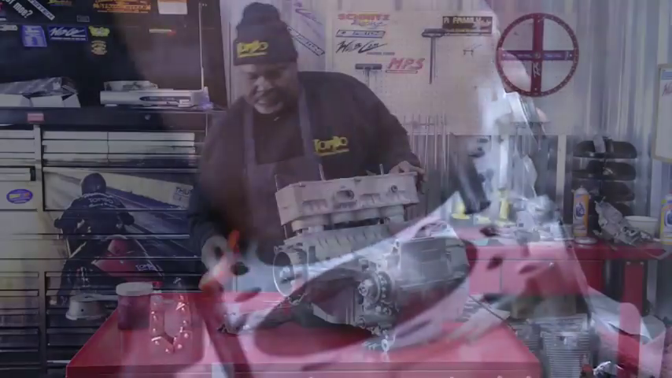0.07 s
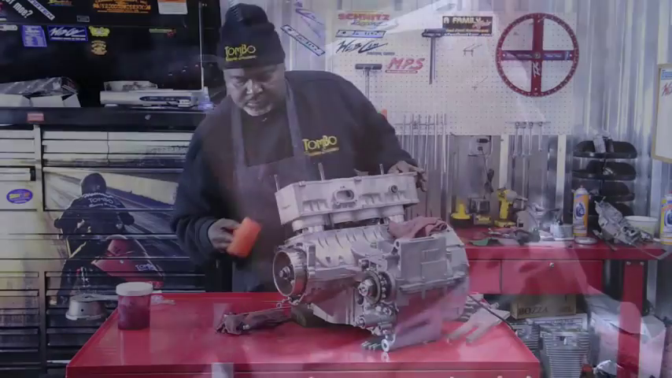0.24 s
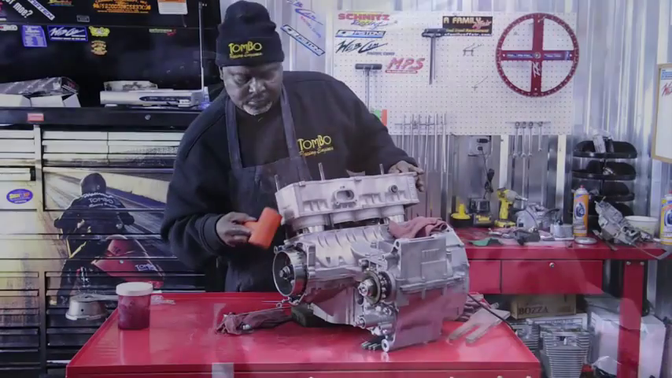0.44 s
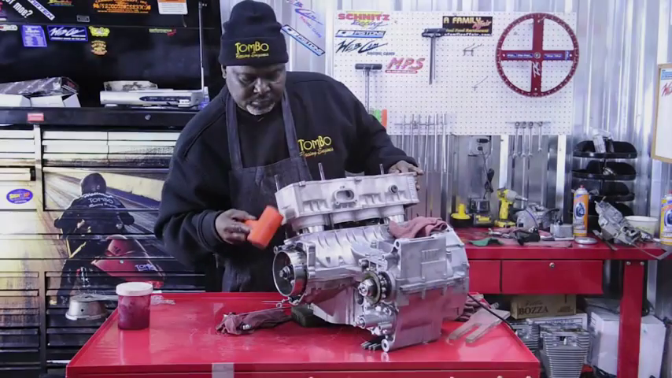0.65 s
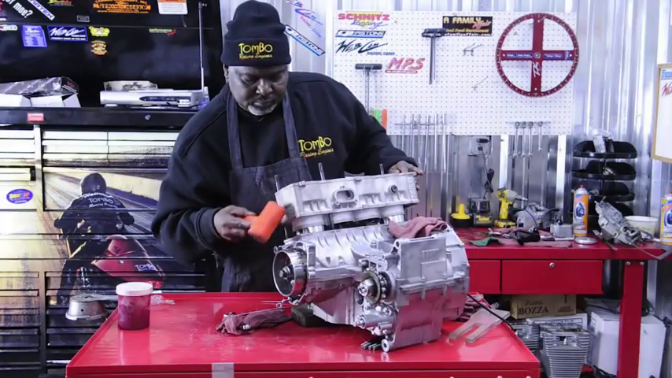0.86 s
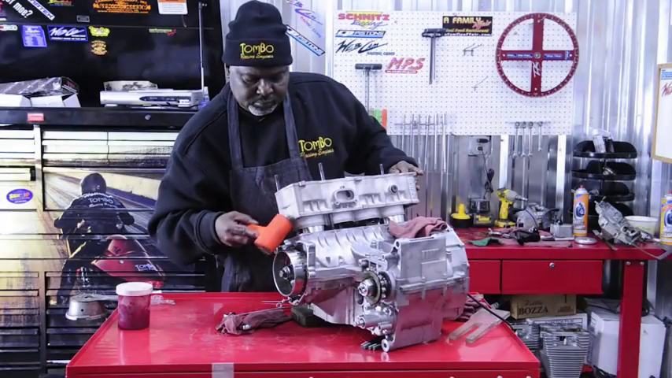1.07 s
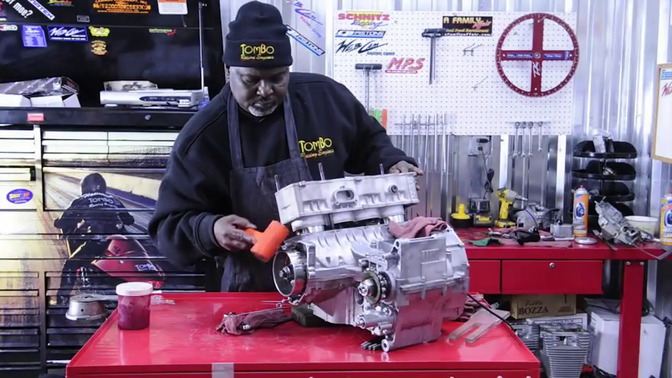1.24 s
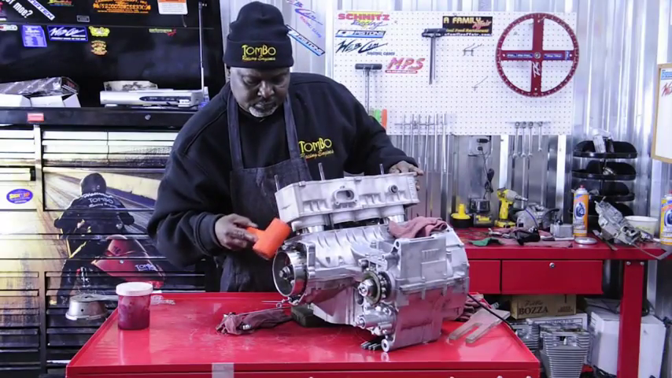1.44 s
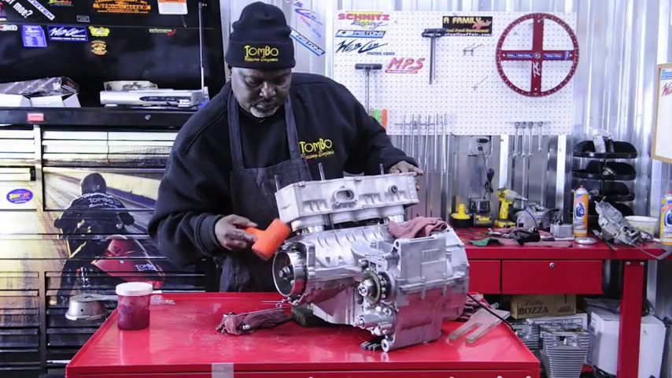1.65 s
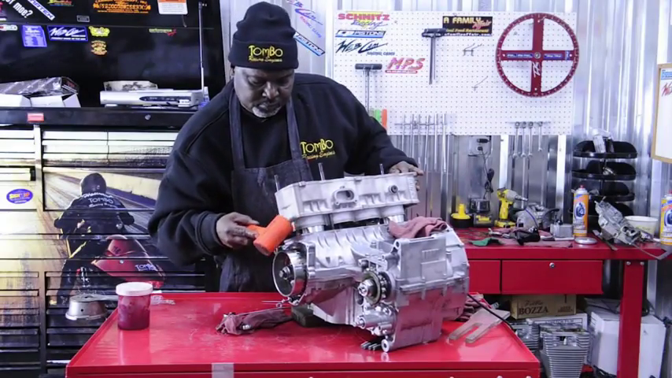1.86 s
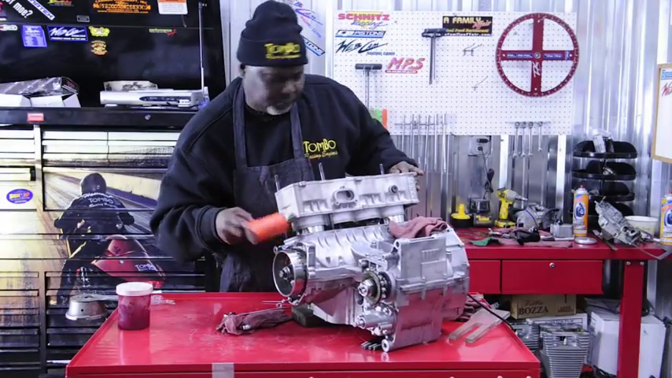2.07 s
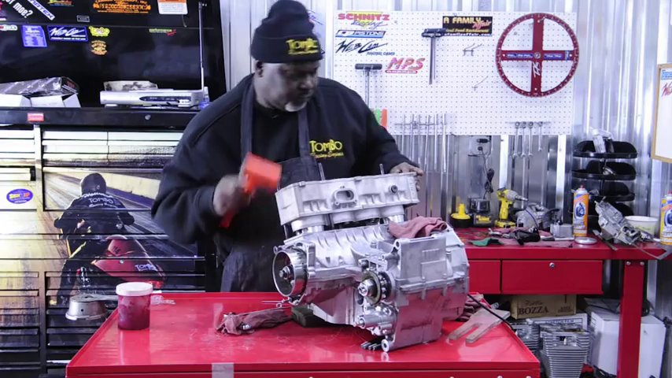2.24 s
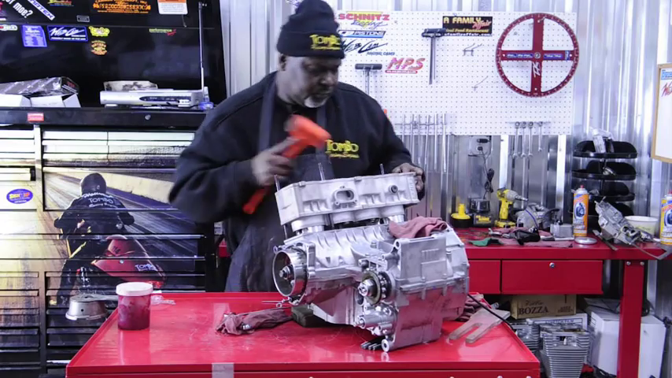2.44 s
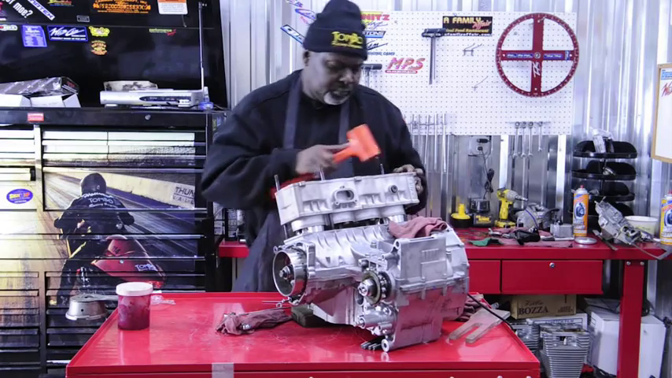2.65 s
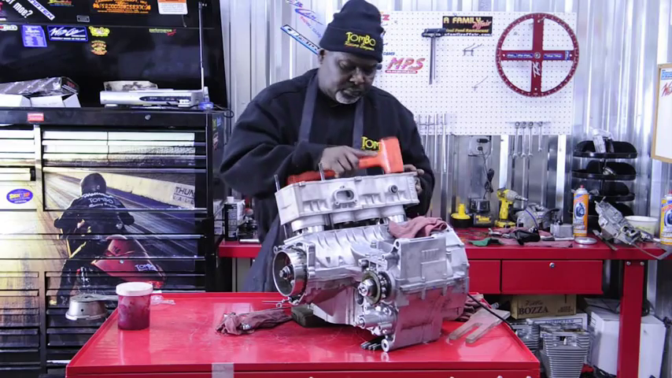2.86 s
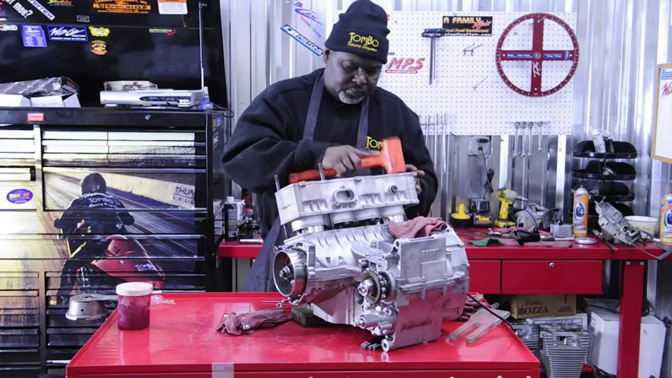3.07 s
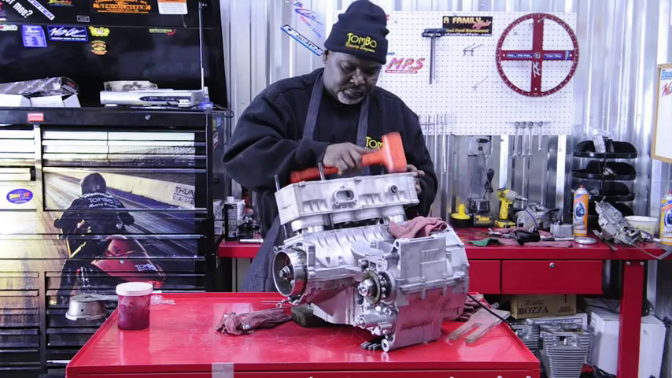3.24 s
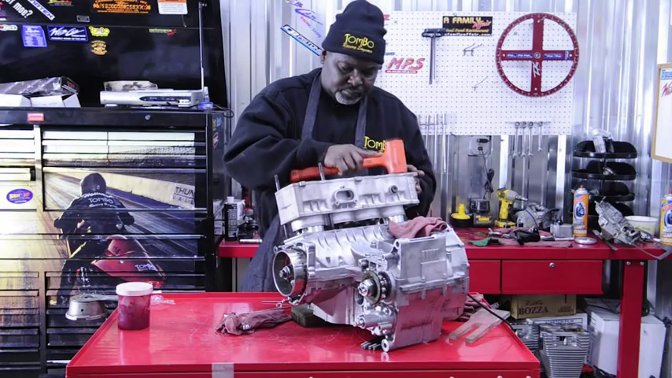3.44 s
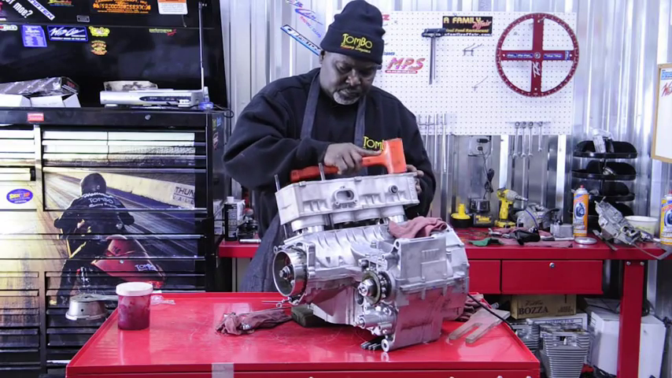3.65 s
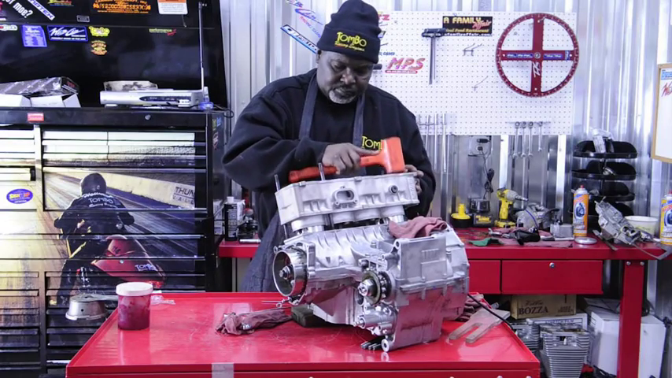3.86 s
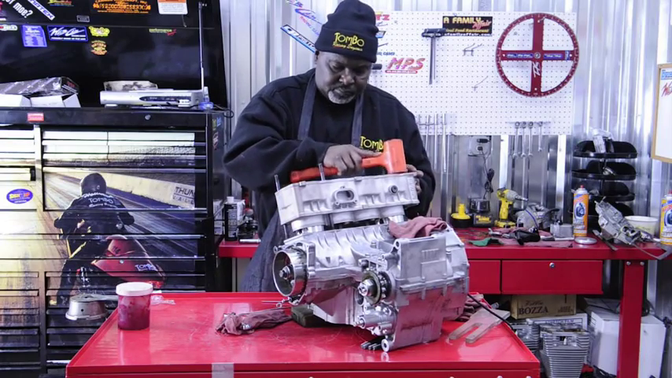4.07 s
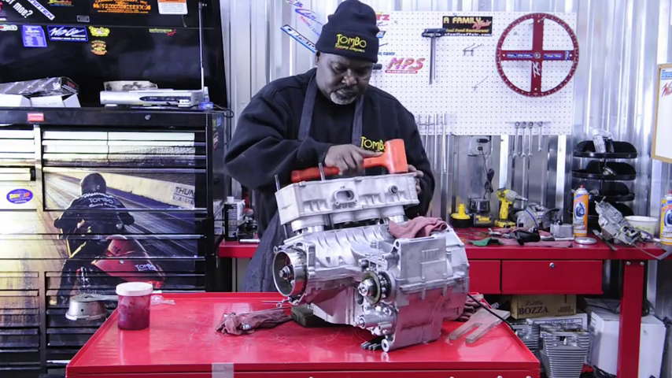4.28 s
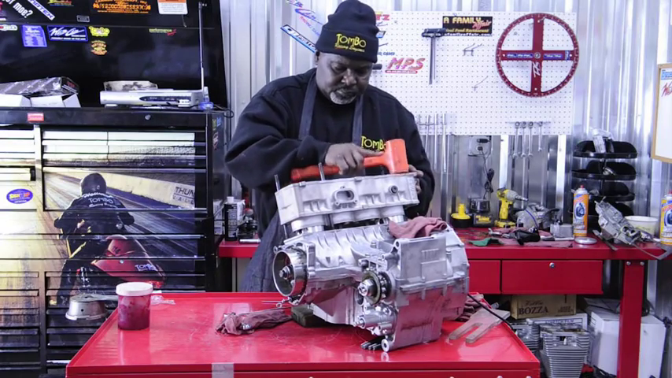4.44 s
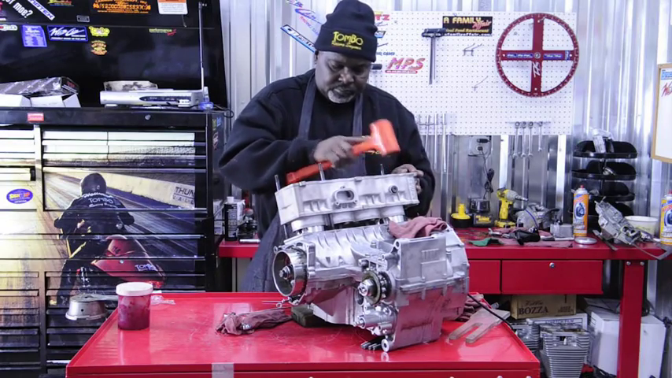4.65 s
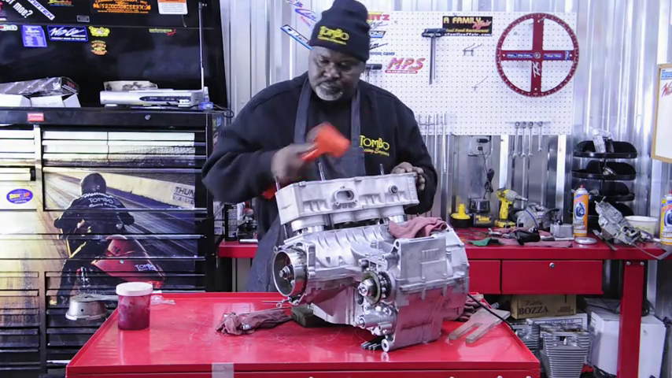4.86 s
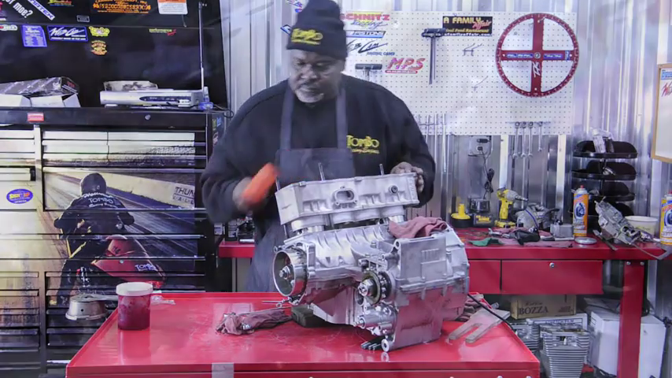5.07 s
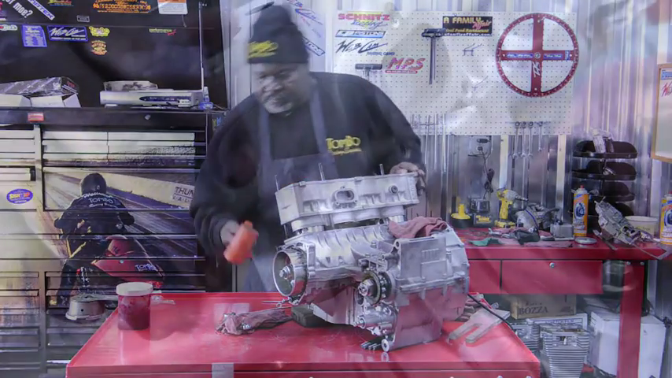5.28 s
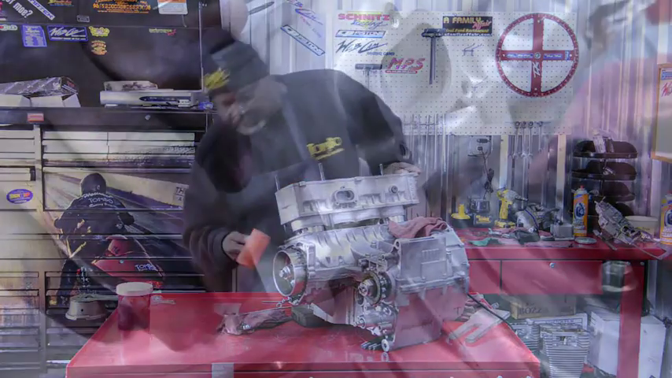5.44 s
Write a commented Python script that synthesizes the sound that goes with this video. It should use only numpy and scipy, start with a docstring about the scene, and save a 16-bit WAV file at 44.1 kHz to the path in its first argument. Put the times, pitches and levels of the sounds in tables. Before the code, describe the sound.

Light ticks and muted taps on cast metal lead into hard, evenly spaced mallet blows, a pause, and three last strikes over faint rumble.

```python
"""Soft taps, then seven heavy knocks and two glancing ones ring over a low rumble, among ticks and rustling.
A shot-filled plastic mallet taps a cast cylinder block down its studs on a steel bench, heard close and near-mono.
Each contact is a damped swing; brief forces feed decaying modes of block and bench, and the studs clack.
Enveloped noise makes the loose shot and the sleeves; a diffuse tail makes the hard-walled workshop answer."""
import sys
import numpy as np
from scipy import signal
from scipy.fft import rfft, irfft
from scipy.io import wavfile
from scipy.ndimage import uniform_filter1d

SR = 44100
rng = np.random.default_rng(int(sys.argv[2]) if len(sys.argv) > 2 else 0)


def master_out(mix):
    """Clip the mix to full scale and print it as 16-bit PCM to the path in sys.argv[1]."""
    frames = np.transpose(np.atleast_2d(mix))
    ceiling = np.clip(frames, -1, 1)
    pcm = np.round(ceiling * 32767).astype(np.int16)
    wavfile.write(sys.argv[1], SR, pcm)


def ratio_of_db(decibels):
    """Turn decibels (scalar or array-like) into linear amplitude factors; 0 dB maps to 1."""
    return 10 ** (np.asarray(decibels, float) / 20)


N = 242991  # samples
T = np.arange(N) / SR  # s


def colour(x, points):
    """Linear filtering: the spectrum is weighted by (Hz, dB) points on a log-frequency axis."""
    hz, db = np.transpose(points)
    f = np.arange(N // 2 + 1) * SR / N + 1  # the added 1 Hz keeps the logarithm finite
    gain = ratio_of_db(np.interp(np.log(f), np.log(hz), db))
    return irfft(rfft(x) * gain, N)


def band(x, lo_hz, hi_hz, order=2):
    """Band limitation by a Butterworth band-pass."""
    edges_hz = [lo_hz, min(hi_hz, 0.45 * SR)]
    return signal.sosfilt(signal.butter(order, edges_hz, "band", fs=SR, output="sos"), x)


def unit(x):
    """Power normalisation to rms 1."""
    return x / np.sqrt(np.mean(x ** 2))


def walk(rate):
    """Random modulation: levels drawn at the given rate in Hz, each slewed into the next."""
    hold = int(SR / rate)
    steps = np.repeat(rng.standard_normal(N // hold + 1), hold)
    return uniform_filter1d(steps, hold)[:N]


# Spectrum of the workshop air. Each row: frequency in Hz, relative density in dB per Hz.
SHOP_SPECTRUM = [(12, -48.5), (20, -10), (60, 3.5), (96, 2.5), (210, -11), (357, -12.5), (678, -30),
                 (738, -29), (897, -28), (2320, -33), (2990, -35), (4420, -41), (14700, -44), (16000, -42)]
SHOP_DB = -49


def shop():
    """Stationary background noise: rumble and faint hiss of the workshop, its low end wavering in level."""
    air = unit(colour(rng.standard_normal(N), SHOP_SPECTRUM))
    low = band(air, 30, 560)
    waver = ratio_of_db(3.19 * walk(4.9))
    return ratio_of_db(SHOP_DB) * (air + low * (waver - 1))


# Spectrum of the faint hiss between the channels. Each row: frequency in Hz, relative density in dB per Hz.
HISS_SPECTRUM = [(20, -6.5), (60, -4.5), (150, -27), (500, -35.5), (1200, -39.5), (3300, -43.5),
                 (4500, -36), (15000, -37.5)]
HISS_DB = -64.5


def side_hiss():
    """Difference signal: faint coloured noise, to be carried in opposite phase by the two channels."""
    return ratio_of_db(HISS_DB) * unit(colour(rng.standard_normal(N), HISS_SPECTRUM))


# Noise bands of the rustle's middle. Each row: centre in Hz, width in Hz, relative level in dB.
PRESENCE_BANDS = [(2450, 1200, 27.5), (2995, 490, 32), (3900, 1200, -12)]
# Swishes of cloth and sliding shot. Each row: peak time in seconds, level of the middle in dB,
# rise and fall in seconds for a tenfold change, treble and body in dB relative to the middle.
SWISHES = [(.01, -57.5, 0.06, 0.19, -21, 15.5), (.11, -67.5, 0.16, 0.17, 5.5, 10),
           (0.318, -57.5, 0.0027, 0.14, -15, 4.5), (.35, -51.5, 0.06, 0.089, -33, 1.5),
           (.56, -59, .03, 0.015, -31, 2), (0.764, -39.5, 0.039, 0.098, -39.5, -12),
           (.86, -58, 0.1, 0.57, -35, 1.5), (1.106, -73, 0.153, 0.01, 4, -10),
           (1.148, -66, 0.024, 0.095, -16, 19.5), (1.31, -55, 0.041, 0.048, -6, -6),
           (1.419, -60.5, 0.064, 0.097, -20, 14), (1.541, -41.5, 0.02, 0.023, -9, -11),
           (1.583, -52, 0.03, 0.1, -31, 5), (1.768, -49.5, 0.041, 0.0153, -6.5, -8),
           (1.804, -27, 0.0044, 0.034, -11, -9.5), (1.87, -54, 0.01, 0.2146, -36, -30),
           (1.962, -57.5, .04, .015, -12, -25), (2.03, -65, 0.01, 0.19, -34, -6),
           (2.341, -55.5, 0.055, .08, -30.5, -1), (2.395, -49.5, 0.049, 0.086, -27, -13),
           (2.466, -66, 0.0058, 0.026, 6, 8), (2.519, -68.5, 0.04, 0.056, 7.5, 11),
           (2.607, -53, 0.079, 0.039, -9, 1), (2.684, -62, 0.087, 0.031, -24, 11.5),
           (3.321, -62.5, 0.0085, 0.0033, 3, -10), (3.502, -52, 0.0059, 0.005, 8, 7),
           (3.73, -62, 0.01, 0.05, -6, -7), (3.772, -48, 0.038, 0.016, 0, -9),
           (3.922, -48, 0.013, 0.0397, -1.5, -11), (4.02, -69, 0.017, 0.48, -24, -13),
           (4.6, -66.5, 0.15, 0.081, -27, 6), (4.751, -60.5, 0.004, 0.011, 9.5, -13),
           (4.78, -60.5, 0.024, 0.017, 7, 10), (5.042, -68.5, 0.13, 0.18, -0.5, -23.5),
           (5.145, -64, 0.0333, .03, -9, -18), (5.369, -64, 0.12, 0.22, -17, 8),
           (5.507, -47, .04, 0.017, -32, 0)]
# Steady shuffle under them. Each row: time in seconds, level of the middle in dB.
SHUFFLE_LEVELS = [(0, -73.5), (1.3, -85.5), (1.65, -74), (2.25, -72), (2.9, -69.5), (3.7, -67),
                  (4.1, -71.5), (4.7, -72), (5.51, -90.5)]
SHUFFLE_TREBLE_DB, SHUFFLE_BODY_DB = -9.5, 6.5  # relative to the middle


def rustle():
    """Friction noise: grainy, lifted near 3 kHz, with its own treble and body; swishes swell and die away."""
    grains = rng.standard_normal((3, N)) * ratio_of_db(2.56 * walk(250))
    middle = unit(sum(ratio_of_db(db) * band(grains[0], hz - width / 2, hz + width / 2, order=1)
                      for hz, width, db in PRESENCE_BANDS))
    treble = unit(colour(grains[1], [(3500, -34), (5000, -9.0), (9000, -3), (15000, -7.5)]))
    body = unit(band(grains[2], 433, 980, order=1))

    shuffle = ratio_of_db(np.interp(T, *np.transpose(SHUFFLE_LEVELS)))
    gain = shuffle * ratio_of_db(np.array([[0], [SHUFFLE_TREBLE_DB], [SHUFFLE_BODY_DB]]))
    for s, db, rise_s, fall_s, treble_db, body_db in SWISHES:
        # three tenfold changes on either side of the peak
        span = slice(max(int((s - 3 * rise_s) * SR), 0), int((s + 3 * fall_s) * SR))
        t = T[span] - s
        shape = ratio_of_db(db - 20 * np.maximum(t / fall_s, -t / rise_s))
        gain[:, span] += shape * ratio_of_db(np.array([[0], [treble_db], [body_db]]))
    return np.sum(gain * [middle, treble, body], axis=0)


# Ticks and bounces, mostly small, and the louder chatter of the glancing blows.
# Each row: start in seconds, level in dB, pitch in Hz, bench thud in dB, shot hiss in dB.
TICKS = [(.013, -37.5, 410, -41, -69.5), (.118, -39, 950, -36, -71), (0.256, -43.5, 1060, -59.5, -63.5),
         (0.315, -46, 910, -49, -78), (.347, -37.5, 3540, -40, -54), (0.558, -44, 2930, -59, -82),
         (.68, -32, 450, -35.5, -70), (.682, -29, 1010, -54, -64), (.748, -37.5, 774, -65, -73.5),
         (.765, -28.5, 2217, -54, -73), (0.836, -50, 990, -40, -61), (1.182, -45, 2550, -39, -82),
         (1.285, -39, 110, -43, -80), (1.388, -26, 2500, -30, -52), (1.42, -47, 4700, -56, -67),
         (1.562, -26, 407, -25.5, -70), (1.803, -32, 2720, -36, -52), (1.817, -40, 2000, -44, -79),
         (1.984, -29.5, 5800, -57, -58), (1.996, -31.5, 3200, -48, -80), (2.074, -45, 2500, -65, -77),
         (2.327, -36, 3650, -42, -59), (2.337, -31, 3200, -37, -51.5), (2.343, -38.5, 186, -55, -67),
         (2.438, -35.5, 734, -53, -80), (2.482, -40.5, 826, -43, -58.5), (2.681, -40.5, 3100, -46, -56),
         (3.676, -19.5, 1410, -40, -38), (3.687, -21.5, 1300, -30.5, -70), (3.873, -14, 1952, -57, -41),
         (3.882, -16.5, 1667, -44.5, -67), (3.888, -16.5, 3200, -51, -75), (4.712, -64, 2000, -61, -58.5),
         (4.745, -65.5, 2500, -55, -67), (4.778, -49.5, 720, -39.5, -56), (4.791, -68, 2500, -60, -85),
         (4.814, -49, 1220, -56, -59.5), (5.213, -47, 432, -61, -77.5), (5.336, -51, 1500, -57, -64)]
TICK_RING_DB = -5.5  # block ring relative to the contact
# Softer taps on the side of the block. Each row: start in seconds, level in dB, clack in dB,
# bench thud in dB, shot hiss in dB.
SIDE_TAPS = [(.827, -24, -38, -30, -63), (1.133, -30, -47, -29, -75), (1.371, -27.5, -25.5, -24, -55.5),
             (1.575, -20, -19.5, -31, -34.5), (1.801, -24, -19, -34, -48),
             (1.982, -31.5, -36.5, -36.5, -41.5)]
SIDE_HZ, SIDE_RING_DB = 414.5, -2
SIDE_CLACK_S, SIDE_CLACK_HZ = 0.007, 3040  # delay and pitch of the clack
# Blows on top of the block, two of them glancing. Each row: start in seconds, level in dB, pitch in Hz,
# clack in dB, shot hiss in dB.
TOP_BLOWS = [(2.9345, -9, 608, -25.5, -40), (3.142, -6, 623, -24.5, -40), (3.3253, -3, 616, -22, -36),
             (3.5096, -1.5, 634, -29, -35.5), (3.674, -20.5, 601, -30, -44.5), (3.865, -20, 620, -32, -34),
             (4.125, -3, 606, -32, -39), (4.325, -2, 608.5, -25, -37.5), (4.4713, 0, 606, -20.5, -32)]
TOP_RING_DB = -3.5
TOP_THUD_DB, THUD_PER_DB = -22.5, 0.37  # thud of a 0 dB blow, and its change per dB of blow
TOP_CLACK_S, TOP_CLACK_HZ = 0.012, 2794
# the clack of the block on its studs: its ring, thud and shot hiss relative to it
CLACK_RING_DB, CLACK_THUD_DB, CLACK_SHOT_DB = -5.5, -16, -21
# the low thump of the head's weight, relative to the blow
THUMP_HZ, SIDE_THUMP_DB, TOP_THUMP_DB = 185.6, -7.5, -25


def clack(s, db, hz):
    """Secondary impact: the block on its studs rings, thuds and stirs the shot in proportion."""
    return s, db, hz, CLACK_RING_DB, db + CLACK_THUD_DB, db + CLACK_SHOT_DB


def thump(s, db):
    """Inertial impact: the head's weight gives a low contact swing without ring, bench thud or shot."""
    return s, db, THUMP_HZ, -np.inf, -np.inf, -np.inf


def knocks():
    """Superposition of impacts as six rows: s, level dB, pitch Hz, relative ring dB, thud dB, shot dB."""
    contacts = [(s, db, hz, TICK_RING_DB, thud_db, shot_db) for s, db, hz, thud_db, shot_db in TICKS]
    for s, db, clack_db, thud_db, shot_db in SIDE_TAPS:
        contacts.append((s, db, SIDE_HZ, SIDE_RING_DB, thud_db, shot_db))
        contacts.append(clack(s + SIDE_CLACK_S, clack_db, SIDE_CLACK_HZ))
        contacts.append(thump(s, db + SIDE_THUMP_DB))
    for s, db, hz, clack_db, shot_db in TOP_BLOWS:
        thud_db = TOP_THUD_DB + THUD_PER_DB * db
        contacts.append((s, db, hz, TOP_RING_DB, thud_db, shot_db))
        contacts.append(clack(s + TOP_CLACK_S, clack_db, TOP_CLACK_HZ))
        contacts.append(thump(s, db + TOP_THUMP_DB))
    return np.transpose(contacts)


def knock():
    """Heavily damped oscillation: the contact itself builds and dies within milliseconds."""
    t, out = T[:SR // 25], np.zeros(N + SR)
    for s, db, hz in knocks()[:3].T:
        rise_s = 1.5 / hz + 0.0004
        envelope = (t / rise_s) ** 2 * np.exp(2 - 2 * t / rise_s)  # reaches 1 at rise_s
        swing = envelope * np.sin(2 * np.pi * hz * t)
        out[int(s * SR):][:len(t)] += ratio_of_db(db) * swing
    return out[:N]


def ring(force, hz, t60):
    """Modal resonance: a two-pole mode decays by 60 dB in t60 seconds; loose joints make it flutter."""
    pole = np.exp(2j * np.pi * hz / SR - np.log(1000) / (t60 * SR))
    flutter = ratio_of_db(4 * walk(hz / 12 + 40))
    return flutter * signal.lfilter([pole.imag], [1, -2 * pole.real, abs(pole) ** 2], force)


def pushes(seconds, gains, cycles, hz):
    """Impulsive excitation: each short contact swings both ways, as a windowed wave at the mode's pitch."""
    force = np.zeros(N)
    np.add.at(force, (np.asarray(seconds) * SR).astype(int), gains)
    window = np.hanning(int(cycles * SR / hz) + 3)
    wave = window * np.cos(2 * np.pi * hz / SR * np.arange(len(window)))
    return signal.fftconvolve(force, 2 * wave / window.sum())[:N]


# Modes of the block on its studs. Each row: frequency in Hz, relative level in dB, t60 in seconds.
BLOCK_MODES = [(329.4, 1, 0.12), (437, -13.5, 0.18), (586, 9.5, 0.015), (634, 7.5, 0.056),
               (712, -4.5, 0.13), (770, -23.5, 0.016), (933, 0, 0.084), (1036, 4.5, 0.05),
               (1132, 6.5, 0.024), (1237, 2, .045), (1370, -0.5, 0.072), (1577.5, 5, 0.03),
               (1831, 1, 0.058), (1822, 2, 0.072), (2016, -19.5, .13), (2134, 5.5, 0.023), (2245, -15, .06),
               (2500, -14.5, 0.26), (2580, -4.5, 0.083), (2663, -5.5, .08), (2930, -16, 0.11),
               (3239, -5, 0.079), (3070, -3.5, 0.06), (3166, -15.5, 0.32), (3197, -7.5, 0.14),
               (3354, -14, 0.29), (3700, -8, .06), (4020, -13, 0.24), (5170, -18, .2), (5800, -17, 0.069)]


def block():
    """Modal excitation: each knock favours modes near its pitch; the struck spot scatters their shares."""
    s, db, centre_hz, ring_db = knocks()[:4]
    hz, mode_db, t60 = np.transpose(BLOCK_MODES)
    off = np.log2(hz / centre_hz[:, None]) / 0.75  # distance in units of 0.75 octave
    spot_db = 1.8 * rng.standard_normal(off.shape)
    share = ratio_of_db(mode_db - 5.92 * np.log2(1 + off ** 2) + spot_db)
    # the shares of one knock add in power to its ring level
    share *= (ratio_of_db(db + ring_db) / np.linalg.norm(share, axis=1))[:, None]
    sign = (-1.) ** np.arange(len(hz))  # successive rows start in opposite phase
    out = np.zeros(N)
    for k in range(len(hz)):
        force = pushes(s, sign[k] * share[:, k], 1.65, hz[k])
        out += ring(force, hz[k], t60[k])
    return out


# Modes of the bench top. Each row: frequency in Hz, relative level in dB, t60 in seconds.
BENCH_MODES = [(47.3, -29, 0.35), (74.5, -17, 0.84), (122.4, -10.5, 0.23), (159.2, -18.5, 0.49),
               (186, -14, 0.42), (230.8, -7.5, .2), (261.4, -10, 0.46), (347.6, -8, 0.16)]


def bench():
    """Transmitted vibration: the weight of the blow reaches the bench modes 3 ms later."""
    s, thud_db = knocks()[[0, 4]]
    scatter_db = 2.5 * rng.standard_normal((len(s), len(BENCH_MODES)))
    share = ratio_of_db(thud_db[:, None] + scatter_db)
    out = np.zeros(N)
    for k, (hz, mode_db, t60) in enumerate(BENCH_MODES):
        force = pushes(s + 0.003, share[:, k], 1.07, hz)
        out += ratio_of_db(mode_db) * ring(force, hz, t60)
    return out


def shot():
    """Granular impact noise: loose shot lands in the head with a tick and a grainy hiss that dies away."""
    s, shot_db = knocks()[[0, 5]]
    spikes = np.zeros(N)
    np.add.at(spikes, (s * SR).astype(int), ratio_of_db(shot_db))
    t = T[:SR // 5]
    tick = 0.92 * np.exp(-t / 0.0015)
    settling = 1.68 * np.exp(-t / 0.015) + 0.5 * np.exp(-t / 0.027)
    grains = rng.standard_normal(N) * ratio_of_db(2.94 * walk(600))
    hiss = colour(grains, [(700, 19.0), (1500, 12), (3000, 12.5), (4500, 3.5), (7000, -3.0), (15000, -7)])
    return unit(hiss) * signal.fftconvolve(spikes, tick + settling)[:N]


# Reverberation of the workshop. Each row: band centre in Hz, t60 in seconds, level in dB.
ROOM_BANDS = [(200, 0.49, -24.5), (450, 0.36, -34.5), (1066, 0.48, -25), (2000, 0.27, -21.5),
              (3300, 1, -24), (5860, .45, -29), (11000, .25, -31)]


def room(x):
    """Diffuse reverberation: every band dies at its own rate; the first reflections are dense and short."""
    t, tail = T[:SR], 0
    for hz, t60, db in ROOM_BANDS:
        noise = unit(band(rng.standard_normal(SR), hz / 1.5, hz * 1.5))
        late = np.exp(-np.log(1000) * t / t60)
        early = 2.0 * np.exp(-t / 0.031)
        decay = late + early
        tail = tail + ratio_of_db(db) * noise * decay / np.linalg.norm(decay)
    onset = np.clip(t / 0.0034, 0, 1)
    return signal.fftconvolve(x, tail * onset)[:N]


def scene():
    """Superposition in mid and side: all sources and the room sit in the middle, the faint hiss at the sides."""
    near = knock() + block() + bench() + shot()
    mid = near + room(near) + rustle() + shop()
    side = side_hiss()
    # the channels differ slightly in gain
    return np.array([mid + side, ratio_of_db(0.09) * mid - side])


def band_limit(x):
    """A steep low-pass at the top of the band."""
    return signal.sosfilt(signal.butter(12, 16790, fs=SR, output="sos"), x)


def record(dry):
    """Soft saturation and low-pass filtering: the loudest peaks are rounded and the top is cut."""
    rounded = np.tanh(0.92 * dry) / 0.89
    top = signal.butter(10, 15700, fs=SR, output="sos")
    mix = signal.sosfilt(top, rounded)
    return band_limit(mix)


dry = scene()
out = record(dry)
master_out(out)
```